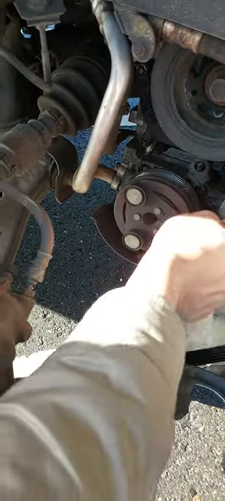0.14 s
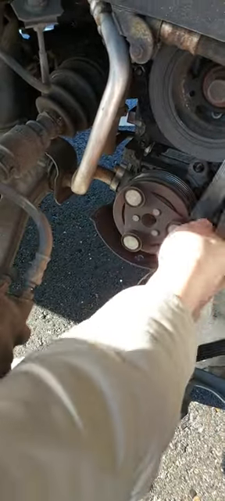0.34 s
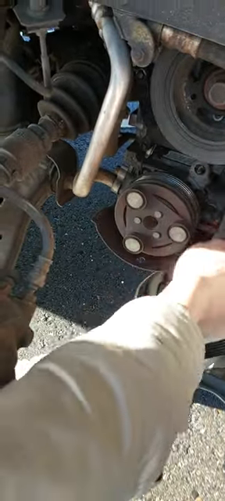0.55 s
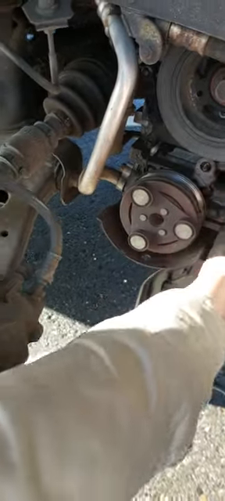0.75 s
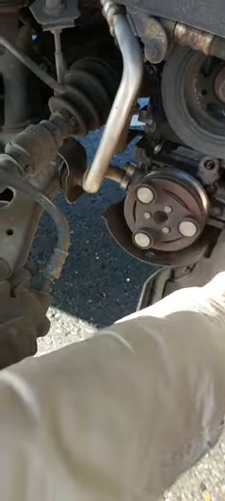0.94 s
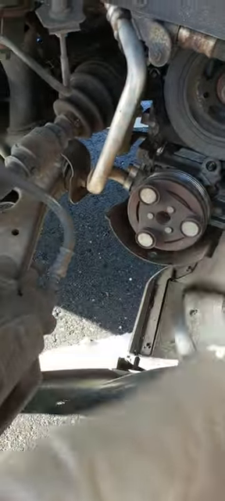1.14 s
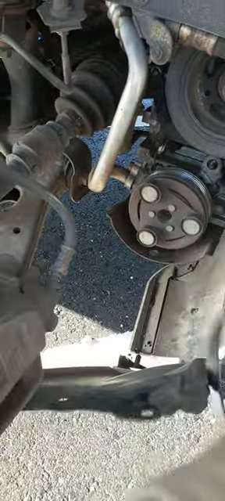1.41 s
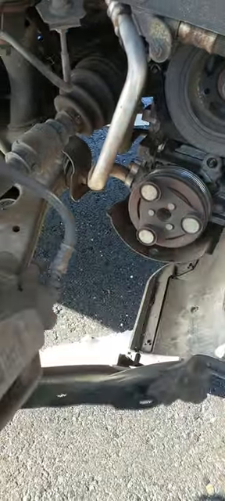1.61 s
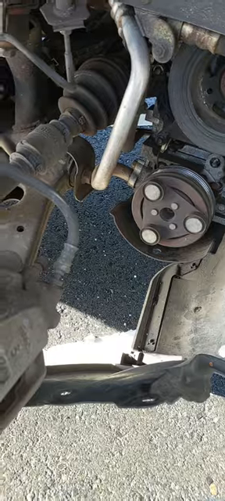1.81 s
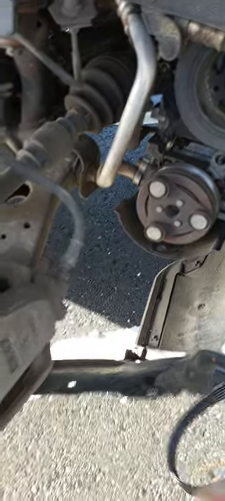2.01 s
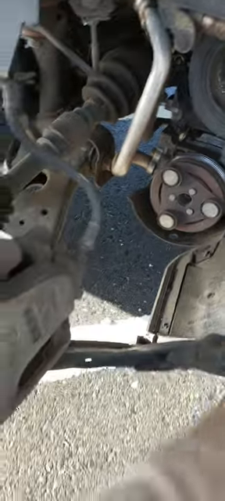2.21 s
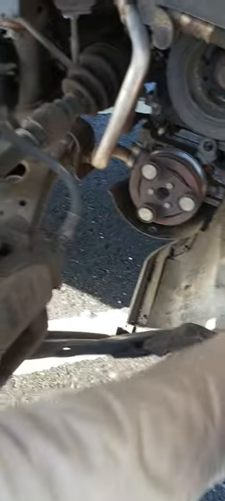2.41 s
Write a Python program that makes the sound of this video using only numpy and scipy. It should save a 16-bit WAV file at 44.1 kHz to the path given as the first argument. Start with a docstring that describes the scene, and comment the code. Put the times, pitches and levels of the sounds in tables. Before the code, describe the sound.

A belt scraping and knocking against engine metal outdoors, a lull midway, over faint distant hum

```python
"""A rubber drive belt is pulled off engine pulleys by hand, outdoors, close to a phone with two ports.
Throughout, distant machinery hums as wavering tones on rumble, and shaped noise hisses in and out.
First the dragged belt scrapes as stick-slip grains through resonances, with low decaying sines as thumps,
hollow knocks and a clack of pulley modes; a calmer stretch follows. After a second the scraping returns
with short singing rubs, then come crowded knocks and clacks, a hard clack near two seconds, and a fade."""
import sys
import numpy as np
from scipy import signal
from scipy.fft import rfft, irfft, next_fast_len
from scipy.io import wavfile
from scipy.ndimage import map_coordinates

SR = 44100
rng = np.random.default_rng(int(sys.argv[2]) if len(sys.argv) > 2 else 0)


def output_pcm(signal):
    """Save a mono or channel-first signal as 16-bit PCM at the path in sys.argv[1].

    Samples are clipped to [-1, 1] before scaling.
    """
    pcm = np.clip(np.atleast_2d(signal).T, -1, 1) * 32767
    wavfile.write(sys.argv[1], SR, np.round(pcm).astype(np.int16))


N = 114660

# tones of distant machinery: (frequency [Hz], mean rms level [dB])
HUM_TONES = [(64.6, -45), (102.3, -48), (172.3, -44.5), (204.6, -58.5), (279.9, -54), (344.5, -62.5)]
# spectrum of the rumble beneath the tones: (frequency [Hz], relative level [dB])
RUMBLE_SPECTRUM = [(12, -59), (20, 2.5), (97, 4), (138, 5.5), (173, -10.5), (233, -9.5), (282, -4.5),
                   (309, -10), (700, -36), (910, -79), (1540, -120)]
# course of the hiss: (time [s], relative level [dB])
HISS_COURSE = [(0, -77), (.06, -64), (.09, -70), (.18, -74), (.21, -59), (.24, -64), (.265, -72),
               (.29, -57), (.34, -70), (.43, -59), (.46, -70), (.49, -72), (.51, -61.5), (.62, -60),
               (.72, -61), (1.13, -60), (1.27, -61), (1.29, -74), (1.38, -81), (1.41, -66), (1.76, -65),
               (1.8, -65), (1.835, -72), (1.85, -61), (1.96, -60.5), (2.05, -61), (2.075, -66.5),
               (2.14, -51), (2.18, -71.5), (2.29, -67.5), (2.31, -51), (2.35, -58), (2.44, -59),
               (2.46, -74), (2.6, -71)]
# spectrum of the hiss at the left port: (frequency [Hz], relative level [dB])
HISS_LEFT_SPECTRUM = [(500, 10), (1000, 5.5), (2000, 6.5), (3500, 4), (7000, 2), (15000, 0.5)]
# spectrum of the hiss at the right port: (frequency [Hz], relative level [dB])
HISS_RIGHT_SPECTRUM = [(500, 11), (1000, 5.5), (2500, 8.5), (4000, 0.5), (5000, 3), (7000, -12), (9500, -2),
                       (11300, -5), (12000, -31), (15000, -10)]
# response of the right port to near sounds: (frequency [Hz], gain [dB])
RIGHT_PORT_GAIN = [(100, -1.7), (300, -2.5), (1000, -2.5), (2500, 2.5), (5000, -2.5), (7500, -10),
                   (9500, 1), (12500, -11.5), (15000, -14)]
# delay of near sounds at the right port: (frequency [Hz], lag [s])
RIGHT_PORT_LAG = [(300, 0.00027), (550, 0.00028), (900, 0.0005486)]
# belt dragged over parts: (time [s], scrape level before dulling [dB], rumble level [dB])
DRAG_COURSE = [(0, -51, -44.5), (.06, -54, -45), (.15, -60, -52), (.21, -59.5, -48), (.24, -48, -30),
               (.265, -61, -40.5), (.295, -49, -42), (.33, -41.5, -25), (.37, -52.5, -38),
               (.43, -53.5, -42), (.47, -61.5, -56), (.52, -61, -53.5), (.55, -44, -21), (.6, -68, -40),
               (.7, -72, -81), (.94, -66, -50.5), (1.02, -47.5, -37.5), (1.12, -58.5, -52), (1.2, -46, -41),
               (1.26, -45, -43), (1.29, -57.5, -50), (1.38, -66, -69), (1.405, -47, -36),
               (1.43, -48.5, -47), (1.46, -51, -42), (1.505, -34.5, -38), (1.53, -53.5, -39),
               (1.565, -43, -35), (1.595, -53.5, -53), (1.615, -43, -27), (1.66, -40, -26),
               (1.76, -43, -24), (1.8, -68, -29), (1.84, -59.5, -58), (1.96, -61.5, -55), (1.98, -44, -34),
               (2.01, -45.5, -36.5), (2.05, -39, -30), (2.075, -59.5, -33.5), (2.14, -43.5, -41),
               (2.165, -51.5, -43), (2.19, -65, -53), (2.28, -55.5, -44.5), (2.31, -63, -31),
               (2.37, -65, -66), (2.44, -81, -78), (2.47, -68, -73), (2.6, -66, -65)]
# resonances of the brackets: (frequency [Hz], width [Hz], relative level [dB])
BRACKET_RESONANCES = [(920, 305, 21), (1215, 120, 8), (1940, 41, 5), (2250, 76, -14), (2810, 51, -8),
                      (3120, 29, -34.5), (3280, 15, -5), (4240, 23, -25), (4700, 46, -23)]
# broad colour of contact noise: (frequency [Hz], relative level [dB])
CONTACT_COLOUR = [(350, -3.5), (600, -5.5), (687, -18), (948, -16.5), (2400, -9), (3190, -11), (3800, -28),
                  (5180, -14.5), (6510, -27), (10000, -24.5), (15000, -31)]
# resonances of the cavity under the car: (frequency [Hz], width [Hz], relative level [dB])
CAVITY_RESONANCES = [(71.5, 32, -7), (142, 47, 0.5), (275.6, 75, -1.5), (422, 20.7, 2), (521.6, 17, -2),
                     (607, 230, -17.5)]
# rubs that set one bracket singing: (start [s], length [s], frequency [Hz], level before windowing [dB])
SINGING_RUBS = [(.085, .040, 950, -53), (.384, .026, 2150, -58), (.497, .023, 3070, -51),
                (.750, .160, 1910, -65), (.959, .066, 1770, -58), (1.050, .220, 515, -51),
                (1.127, .017, 2300, -51), (1.180, .023, 2650, -48), (1.199, .017, 1880, -48),
                (1.240, .035, 1100, -45), (1.242, .027, 2780, -47), (1.251, .024, 1900, -49),
                (1.465, .060, 1000, -43), (1.496, .017, 2780, -39), (1.544, .030, 1550, -40),
                (1.553, .030, 2150, -41), (1.597, .050, 1950, -41), (1.598, .047, 1020, -34),
                (1.601, .040, 2320, -46), (1.646, .034, 950, -39), (1.650, .015, 1450, -42),
                (1.674, .037, 2620, -49), (1.681, .024, 950, -38), (1.699, .017, 2000, -45),
                (1.706, .084, 1050, -38), (1.989, .030, 1980, -45), (2.087, .070, 600, -45),
                (2.102, .064, 2230, -45), (2.124, .021, 3500, -51), (2.130, .030, 4700, -52)]
# dull blows on the frame: (time [s], envelope peak [dB], frequency [Hz], rise [s], 60 dB decay [s])
FRAME_THUMPS = [(.045, -32, 222, 0.0044, 0.055), (0.219, -13, 452, 0.0059, 0.023),
                (1.413, -34.5, 298, 0.0061, 0.056), (1.602, -17, 293, 0.0026, 0.047),
                (2.036, -22.5, 310, 0.0027, .08), (.312, -10.5, 77.2, 0.003, 0.22),
                (.314, -17, 214.5, 0.0071, 0.057), (0.316, -25, 321, 0.0084, 0.11),
                (0.359, -23, 128.5, 0.0032, 0.39), (0.529, -9, 71, 0.0064, 0.14),
                (1.169, -24.5, 103, 0.0038, 0.033), (1.738, -18, 60.1, 0.019, 0.2),
                (1.792, -25.5, 59.6, 0.018, 0.077), (2.037, -21, 128, 0.0027, 0.23),
                (2.097, -28, 117, 0.0055, 0.099), (2.299, -33.5, 137.4, 0.036, 0.42)]
# belt on metal: (time [s], relative click level [dB], click 60 dB decay [s], click roll-off [Hz],
#                 ring frequency [Hz], relative ring level [dB])
BELT_KNOCKS = [(0.22, -27.5, 0.039, 1430, 467, -10.5), (0.309, -19.5, 0.036, 4600, 610, -21),
               (.351, -38, 0.021, 700, 506, -26.5), (0.434, -40.5, 0.032, 2980, 490, -29.5),
               (0.502, -41, 0.041, 3000, 1110, -32), (0.562, -37, 0.047, 900, 438, -21.5),
               (1.206, -31.5, 0.024, 3000, 432, -36), (1.395, -42, 0.057, 2000, 420, -50),
               (1.536, -21.5, 0.099, 6700, 477, -33), (1.602, -25, 0.068, 1900, 570, -26),
               (1.748, -33.5, 0.039, 2470, 780, -27), (2.003, -36.5, 0.049, 2000, 510, -21),
               (2.028, -19, 0.064, 8850, 463, -32), (2.089, -59, 0.021, 1000, 550, -39),
               (2.247, -47, 0.023, 3000, 497, -35.5), (2.297, -34, 0.0066, 2500, 282, -24.5)]
# partials of a hollow ring: (multiple of the ring frequency, relative level [dB])
RING_PARTIALS = [(1.001, 2.5), (1.33, -8), (2.3, -22)]
# hard blows on the pulley: (time [s], relative level [dB], centre of modes excited [Hz],
#                            spread [octaves], right port lag [s])
PULLEY_CLACKS = [(.3095, -13.5, 1920, 0.85, 0.00053), (.562, -23.5, 827, 0.51, 0.00019),
                 (1.534, -21, 2260, 0.99, 0.00063), (1.546, -33, 1780, .4, 0.00059),
                 (1.748, -22, 1920, 0.42, 0.00041), (2.027, -11, 2490, 0.38, 0.000026),
                 (2.037, -35.5, 2640, 0.77, 0.000016), (2.273, -54, 900, .7, 0.000087)]
# modes of the pulley: (frequency [Hz], relative level [dB], 60 dB decay [s])
PULLEY_MODES = [(747, 3, 0.033), (1056, 0, 0.049), (1346, 1.5, 0.039), (1813, -5, 0.035), (2303, -7, 0.024),
                (2557, -5, 0.02), (2873, -11, 0.059), (3252, -6.5, 0.042), (4090, -8, 0.027),
                (5145, -7, 0.052), (6210, -9.5, 0.022)]

HUM_WAVER_HZ, HUM_WAVER_DB = 2.426, 3.5  # standard deviations at the random knots
RUMBLE_DB, HISS_DB = -41, 4  # mean rumble level; gain added to the hiss course
BRACKETS_DB = -2.5  # resonances against the broad colour
GRAINS_PER_S, GRAIN_SPREAD_DB = 3000, 2
DULLING, SPLIT_HZ = 0.6, 1930  # dB of treble per dB of scrape over rumble; where the treble begins
RUB_Q, RUB_STEADY = 16, 0.4  # sharpness; exponent that evens out the flutter
RING_CYCLES, KNOCK_ATTACK_S = 14.2, 0.00054  # cycles to fall 60 dB; time constant
CLACK_ATTACK_S, CLACK_SCATTER_DB = 0.0012, 1.5  # time constant; random spread between modes
ECHO_DB, RUB_ECHO_DB = 6.5, -6
ECHO_T60, ECHO_RENEW_S = 0.02, 0.03  # s
LOW_CUT_HZ, TOP_HZ = 30, 15800


def amp(db):
    """Decibel law: 20 dB is a tenfold amplitude."""
    return 10 ** (np.asarray(db) / 20)


def unit(x):
    """Normalisation to unit root mean square."""
    return x / np.sqrt(np.mean(x ** 2) + 1e-20)


def along(points, hz):
    """Linear interpolation of (frequency, value) points on a logarithmic frequency axis."""
    f, values = np.transpose(points)
    return np.interp(np.log(hz + 1), np.log(f + 1), values)


def curves(rows):
    """Linear interpolation in time, one curve for each column after the first."""
    times, *columns = np.transpose(rows)
    return [np.interp(np.arange(N) / SR, times, column) for column in columns]


def wobble(rate):
    """Slow random modulation: a spline through `rate` Gaussian knots a second."""
    knots = rng.standard_normal(int(N * rate / SR) + 4)
    return map_coordinates(knots, [np.arange(N) * rate / SR])


def filtered(x, response):
    """Linear filtering: the spectrum times a response of frequency."""
    m = next_fast_len(N + SR // 2)
    return irfft(rfft(x, m) * response(np.fft.rfftfreq(m, 1 / SR)), m)[..., :N]


def resonances(peaks, f):
    """Superposition of damped resonators with alternating polarity."""
    total = 0
    for k, (centre, width, db) in enumerate(peaks):
        damping = 1j * f * width
        total = total + (-1) ** k * amp(db) * damping / (centre * centre - f * f + damping)
    return total


def contact(x):
    """Forced response of the brackets: broad contact colour plus resonances."""
    top = max(db for _, _, db in BRACKET_RESONANCES)
    colour = [(200, -65)] + list(CONTACT_COLOUR)
    return filtered(x, lambda f: amp(along(colour, f))
                    + amp(BRACKETS_DB - top) * resonances(BRACKET_RESONANCES, f))


def add(x, s, sound):
    """Superposition of a sound at time s, in place."""
    i = round(s * SR)
    x[i:i + len(sound)] += sound[:len(x) - i]


def hum():
    """Amplitude and frequency modulation of steady tones, over partly correlated rumble at the ports."""
    t = np.arange(N) / SR
    tones = np.zeros(N)
    for hz, db in HUM_TONES:
        level = np.sqrt(2) * amp(db + HUM_WAVER_DB * wobble(8.03))
        drift = np.cumsum(HUM_WAVER_HZ * wobble(10.37)) / SR
        tones += level * np.sin(2 * np.pi * (hz * t + drift + rng.random()))
    spectrum = list(RUMBLE_SPECTRUM) + [(1200, -89)]
    mid, side = filtered(rng.standard_normal((2, N)), lambda f: amp(along(spectrum, f)))
    rumble = unit(np.array([mid + 0.57 * side, mid - 0.84 * side]))
    return tones + amp(RUMBLE_DB + 4.3 * wobble(11.38)) * rumble


def hiss():
    """Uncorrelated noise at the two ports, each with its own spectrum, under one shared envelope."""
    level_db, = curves(HISS_COURSE)
    pair = filtered(rng.standard_normal((2, N)), lambda f: (f > 300) * amp(
        [along(HISS_LEFT_SPECTRUM, f), along(HISS_RIGHT_SPECTRUM, f)]))
    return amp(level_db + HISS_DB + 2.55 * wobble(40.275)) * pair


def grains(rate):
    """Stick-slip friction as random impulses, `rate` a second on average."""
    slips = (rng.random(N) < rate / SR) * rng.standard_normal(N)
    return slips * amp(GRAIN_SPREAD_DB * wobble(120))


def drag():
    """Stick-slip of the ribbed belt drives brackets and cavity; rumble above scrape dulls the treble."""
    scrape_db, rumble_db = curves(DRAG_COURSE)
    scrape = unit(contact(grains(GRAINS_PER_S)))
    treble = filtered(scrape, lambda f: 1 / (1 + (SPLIT_HZ / (f + 1)) ** 6))
    treble_gain = amp(DULLING * np.clip(scrape_db - rumble_db, -20, 10))
    scrape = scrape + (treble_gain - 1) * treble
    rumble = unit(filtered(grains(GRAINS_PER_S / 2),
                           lambda f: resonances(CAVITY_RESONANCES, f) / (1 + 1j * f / 900) ** 2))
    return amp(scrape_db) * scrape + amp(rumble_db) * rumble


def rubs():
    """Friction-driven resonance: dense slips through one sharp peak, swelling and fading."""
    x = np.zeros(N)
    for s, length, hz, db in SINGING_RUBS:
        slips = rng.standard_normal(SR // 4) * (rng.random(SR // 4) < GRAINS_PER_S / SR)
        singing = signal.lfilter(*signal.iirpeak(hz, RUB_Q, SR), slips)
        envelope = np.abs(signal.hilbert(singing)) + 1e-4
        singing = unit(singing / envelope ** RUB_STEADY)
        n = round(length * SR)
        add(x, s, amp(db) * singing[-n:] * np.hanning(n) ** 0.17)
    return x


def thumps():
    """Damped low-frequency oscillation of the frame: each blow swells, then decays exponentially."""
    x, t = np.zeros(N), np.arange(SR // 2) / SR
    for s, db, hz, rise_s, t60 in FRAME_THUMPS:
        shape = amp(-60 * t / t60) * (1 - np.exp(-(t / rise_s) ** 2))
        add(x, s, amp(db) * shape / shape.max() * np.sin(2 * np.pi * hz * t))
    return x


def knocks():
    """Impact excitation: a noise click through the bracket response and a short hollow ring."""
    clicks, rings, t = np.zeros(N), np.zeros(N), np.arange(SR // 5) / SR
    rise = 1 - np.exp(-t / KNOCK_ATTACK_S)
    for s, db, t60, top_hz, hz, ring_db in BELT_KNOCKS:
        low_pass = signal.butter(1, top_hz, fs=SR)
        noise = unit(signal.lfilter(*low_pass, rng.standard_normal(len(t))))
        add(clicks, s, amp(db - 60 * t / t60) * rise * noise)
        partials = sum(amp(d) * np.sin(2 * np.pi * k * hz * t) for k, d in RING_PARTIALS)
        add(rings, s, amp(ring_db - 60 * t * hz / RING_CYCLES) * rise * partials)
    contact_gain = np.std(contact(rng.standard_normal(N)))
    return contact(clicks) / contact_gain * 0.42 + rings


def clacks():
    """Modal excitation: a blow rings pulley modes near its centre, later and coloured at the right port."""
    x, t = np.zeros((2, N)), np.arange(SR // 8) / SR
    scatter = rng.normal(0, CLACK_SCATTER_DB, (len(PULLEY_CLACKS), len(PULLEY_MODES)))
    for (s, db, centre_hz, spread, lag), extras in zip(PULLEY_CLACKS, scatter):
        arrivals = (t, np.maximum(t - lag, 0))
        for port, late, is_right in zip(x, arrivals, (0, 1)):
            ring = np.zeros(len(t))
            for (hz, level, t60), extra in zip(PULLEY_MODES, extras):
                off_centre_db = -10.1 * (np.log2(hz / centre_hz) / spread) ** 2
                port_db = is_right * along(RIGHT_PORT_GAIN, hz)
                mode_db = db + level + extra + off_centre_db + port_db
                ring += amp(mode_db - 60 * late / t60) * np.sin(2 * np.pi * hz * late)
            add(port, s, ring * (1 - np.exp(-late / CLACK_ATTACK_S)))
    return x


def ports(x, echo_db):
    """Scattering from parts nearby, as short random tails redrawn at a fixed interval; the right port lags."""
    step = round(ECHO_RENEW_S * SR)
    t = np.arange(step) / SR
    wet, padded = np.zeros((2, N + 5 * step)), np.pad(x, (step, 2 * step))
    # overlapping windows crossfade from one random tail to the next
    for i in range(0, N + step, step):
        tail = rng.standard_normal((2, step)) * amp(-60 * t / ECHO_T60)
        tail /= np.linalg.norm(tail, axis=1, keepdims=True)
        windowed = padded[i:i + 2 * step] * np.hanning(2 * step)
        piece = signal.fftconvolve(windowed[None], tail, axes=1)
        wet[:, i:i + piece.shape[1]] += piece
    wet = filtered(wet[:, step:N + step], lambda f: (f / (f + 300)) ** 2)

    def port_responses(f):
        """Left is flat; right has its own gain and a phase delay."""
        delay = np.exp(-2j * np.pi * f * along(RIGHT_PORT_LAG, f))
        return np.array([f ** 0, amp(along(RIGHT_PORT_GAIN, f)) * delay])

    return filtered(x + amp(echo_db) * wet, port_responses)


def scene():
    """Superposition of the background and the near work on the belt."""
    background = hum() + hiss()
    contacts = ports(drag() + thumps() + knocks(), ECHO_DB)
    return background + contacts + ports(rubs(), RUB_ECHO_DB) + clacks()


def record(dry):
    """Band limitation by the phone: a second-order high-pass and a sharp upper limit."""
    return filtered(dry, lambda hz: (1j * hz / (LOW_CUT_HZ + 1j * hz)) ** 2 * (hz < TOP_HZ))


dry = scene()
out = record(dry)
output_pcm(out)
```